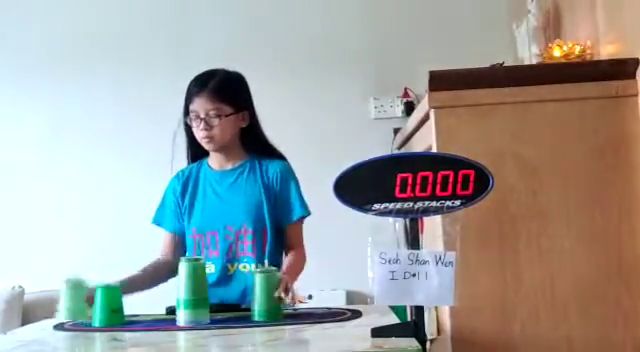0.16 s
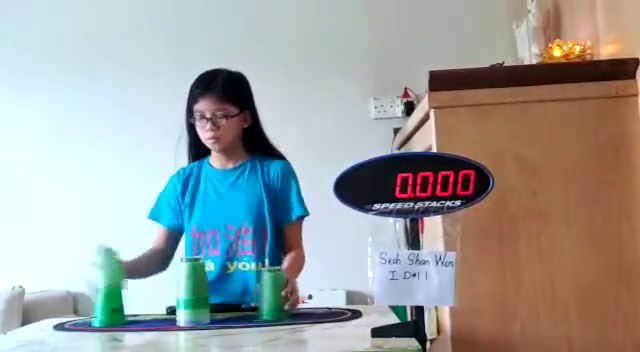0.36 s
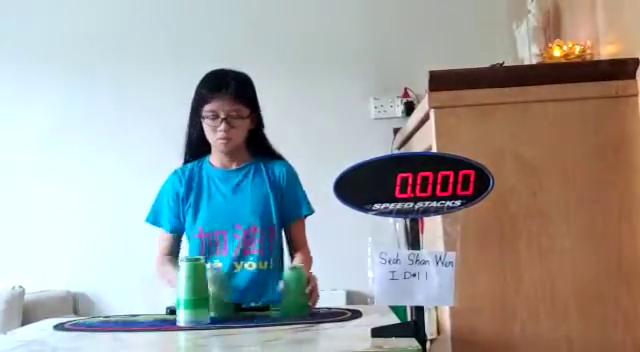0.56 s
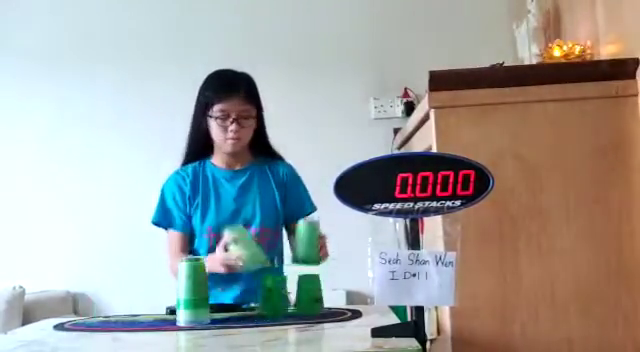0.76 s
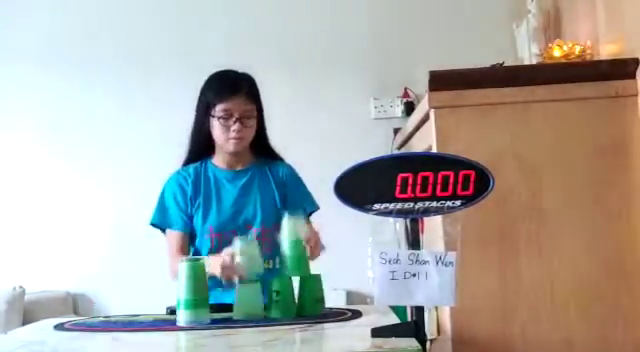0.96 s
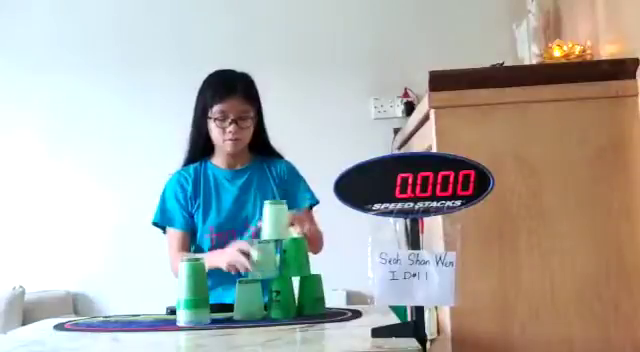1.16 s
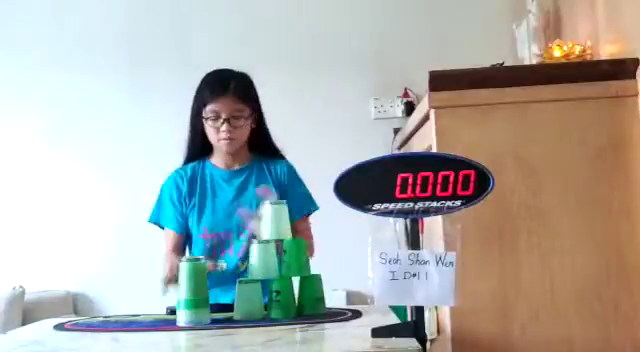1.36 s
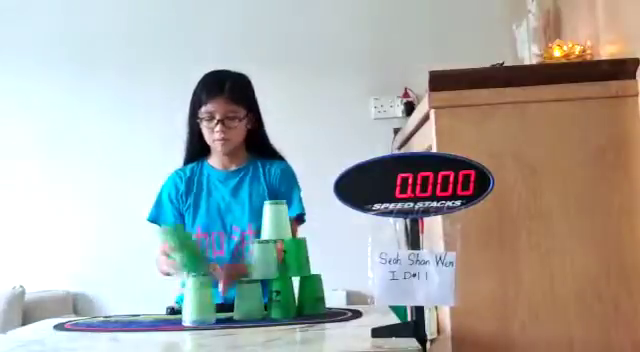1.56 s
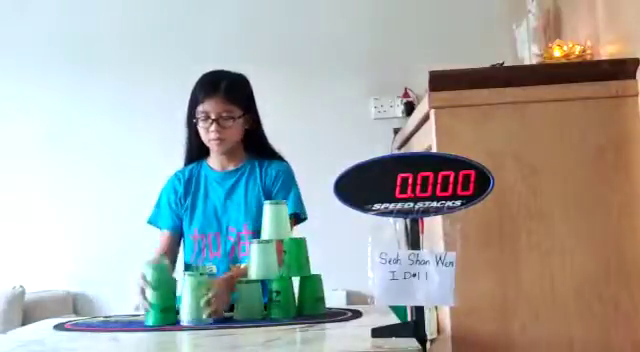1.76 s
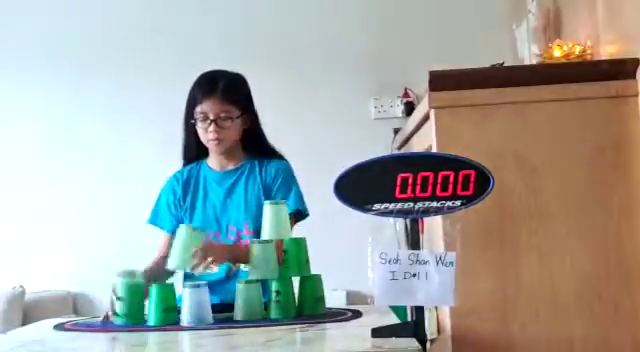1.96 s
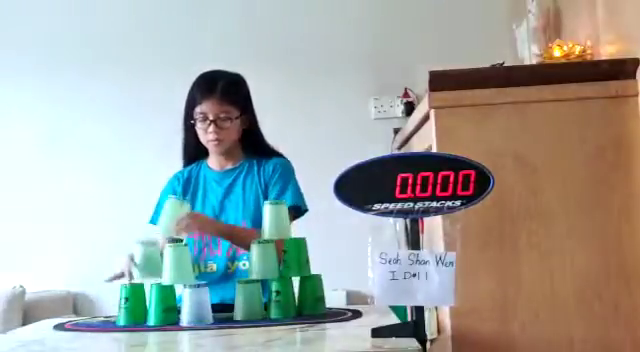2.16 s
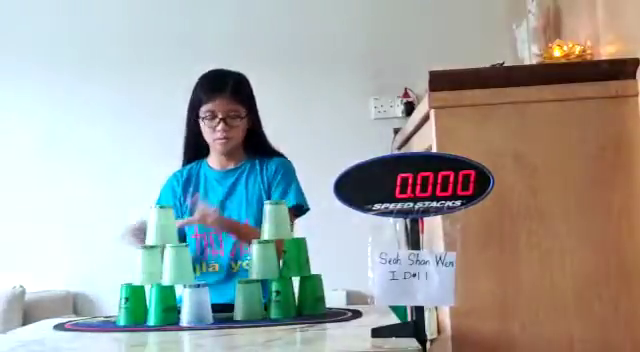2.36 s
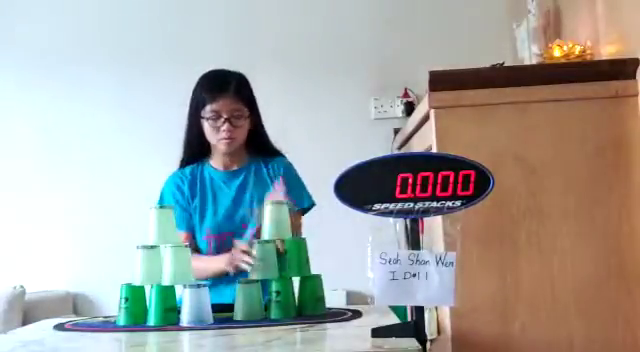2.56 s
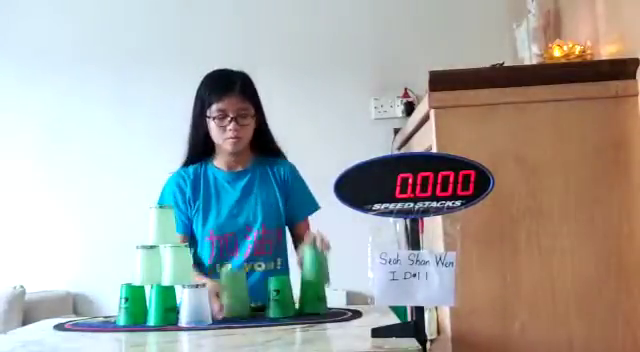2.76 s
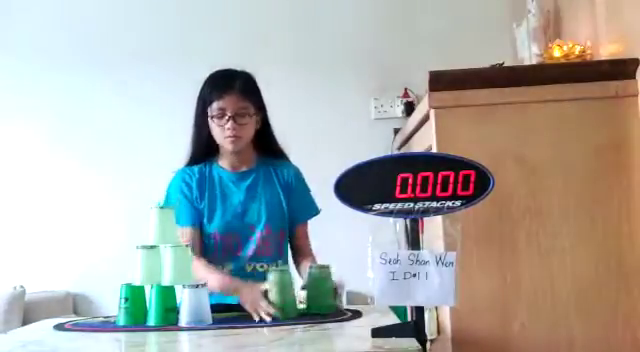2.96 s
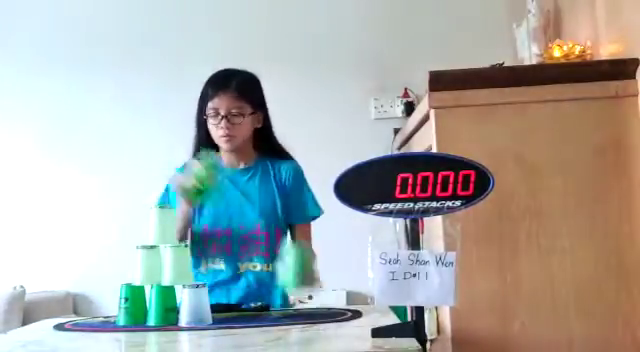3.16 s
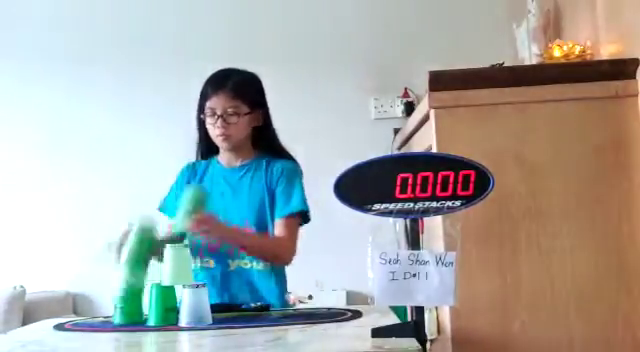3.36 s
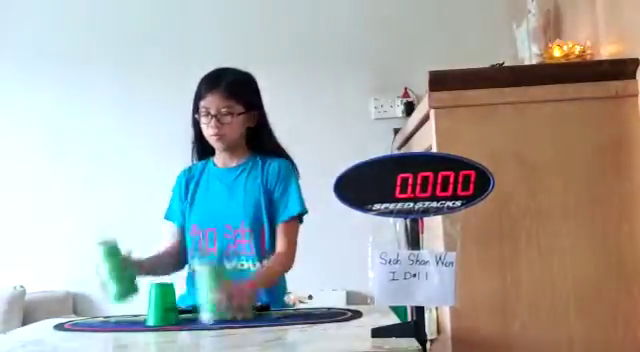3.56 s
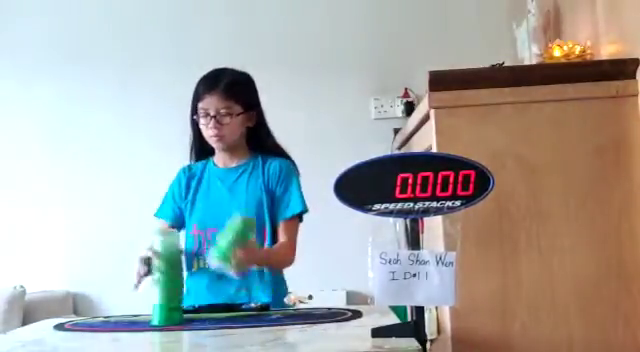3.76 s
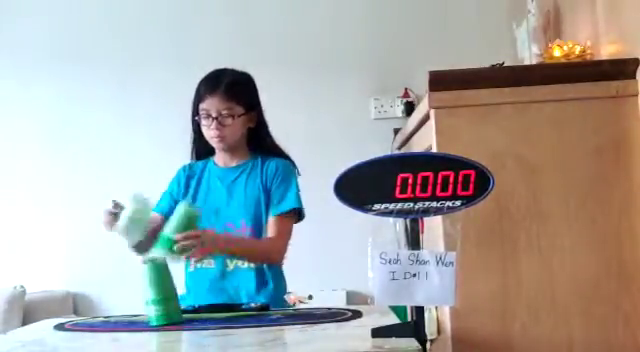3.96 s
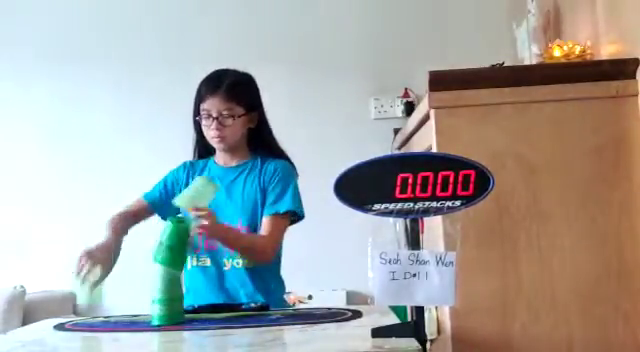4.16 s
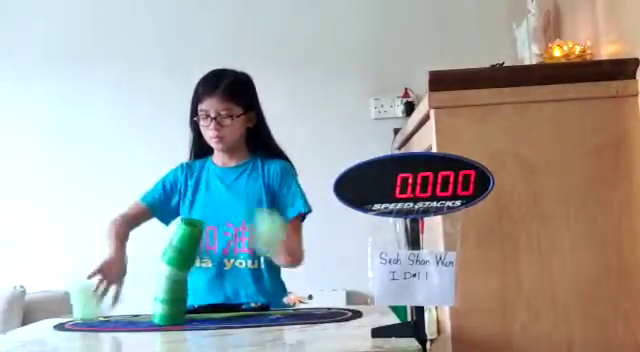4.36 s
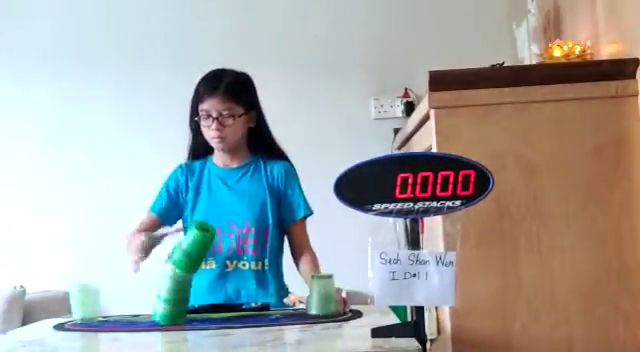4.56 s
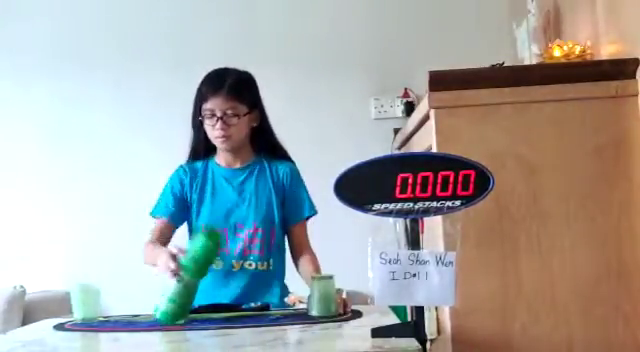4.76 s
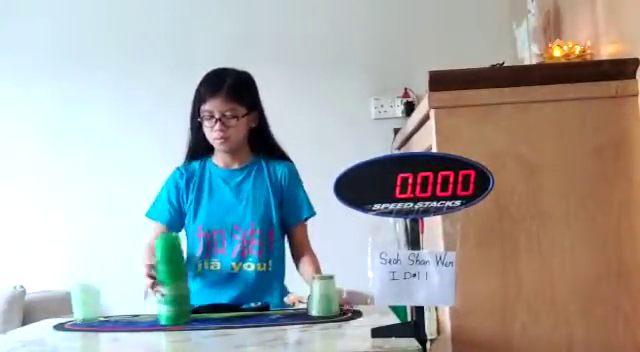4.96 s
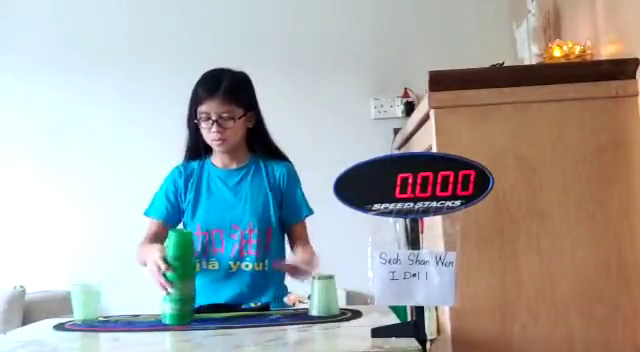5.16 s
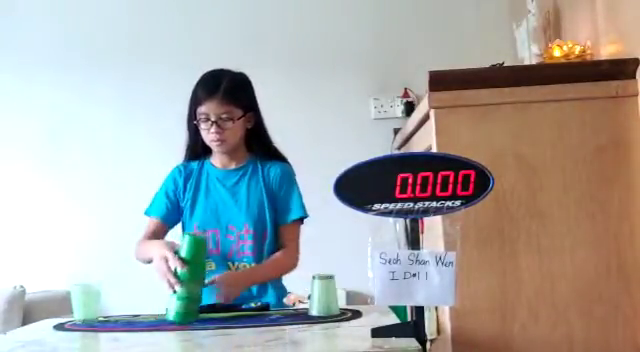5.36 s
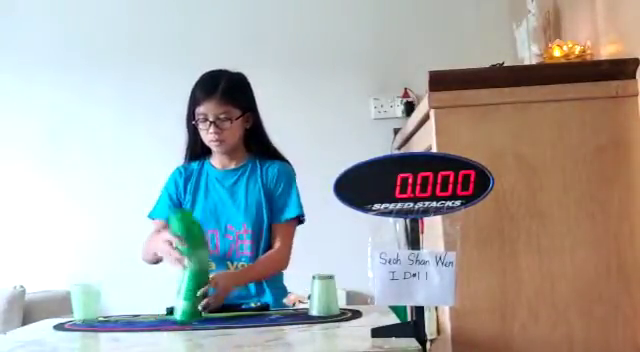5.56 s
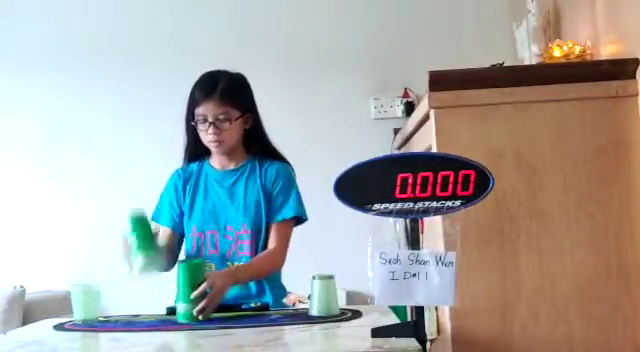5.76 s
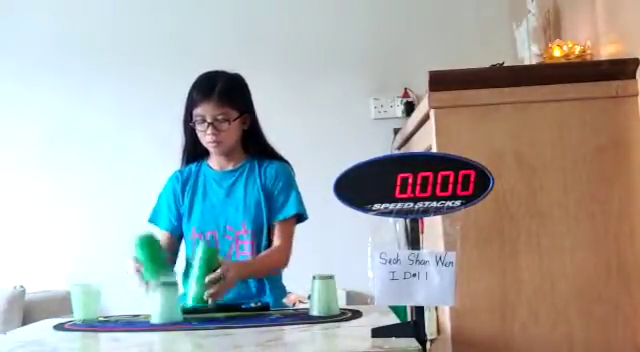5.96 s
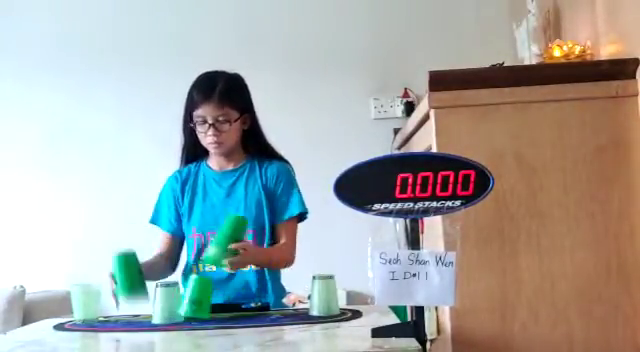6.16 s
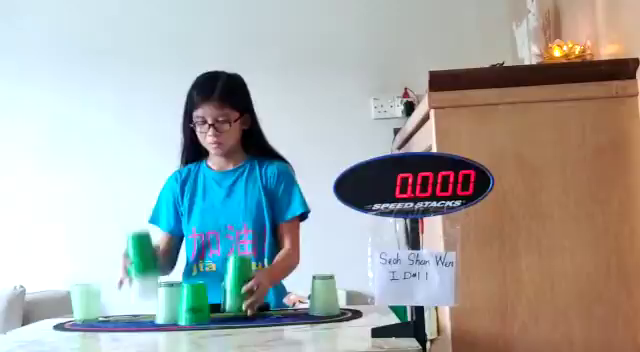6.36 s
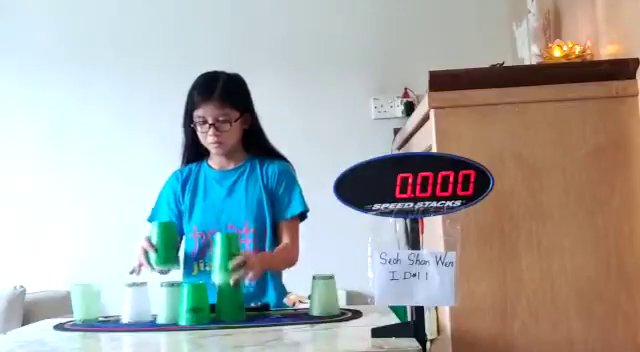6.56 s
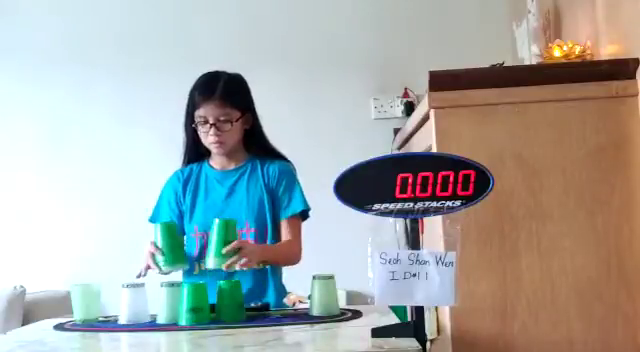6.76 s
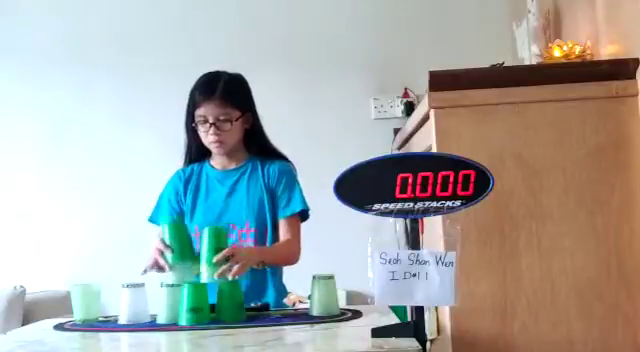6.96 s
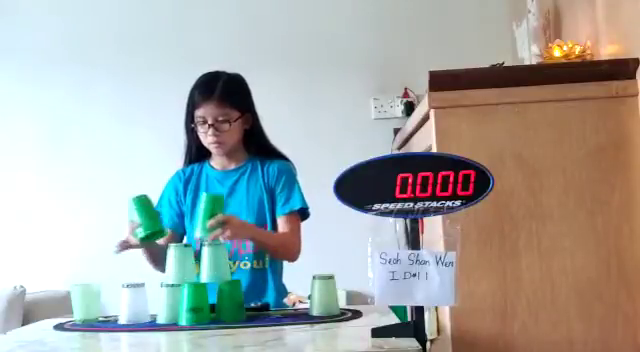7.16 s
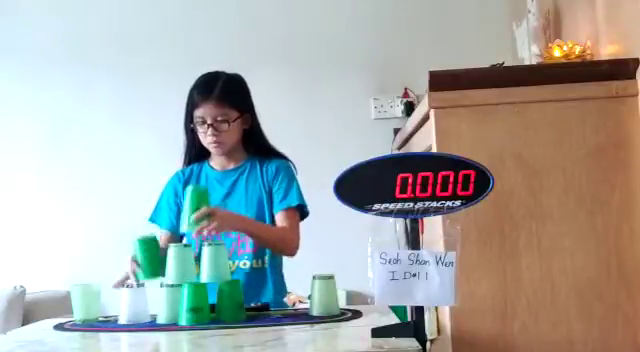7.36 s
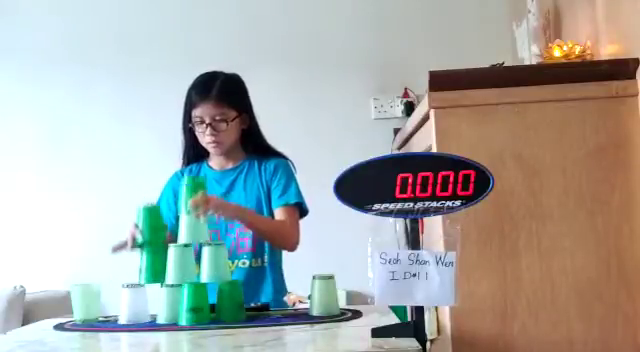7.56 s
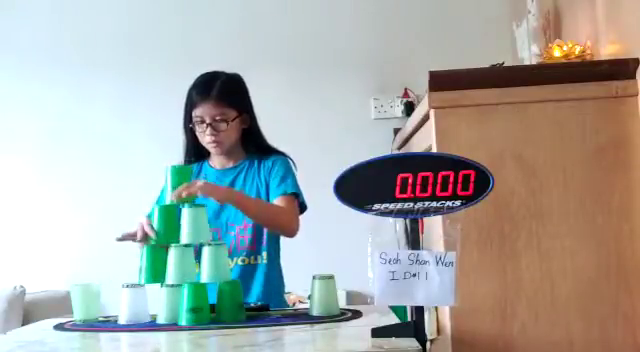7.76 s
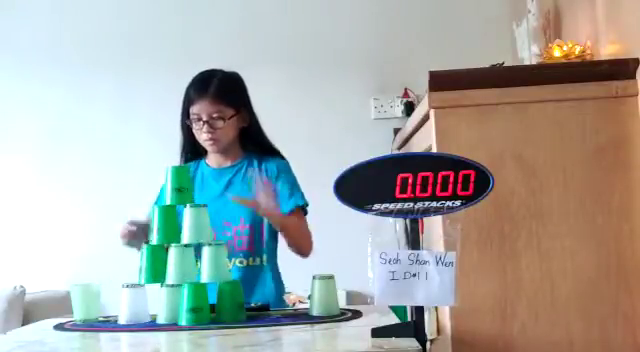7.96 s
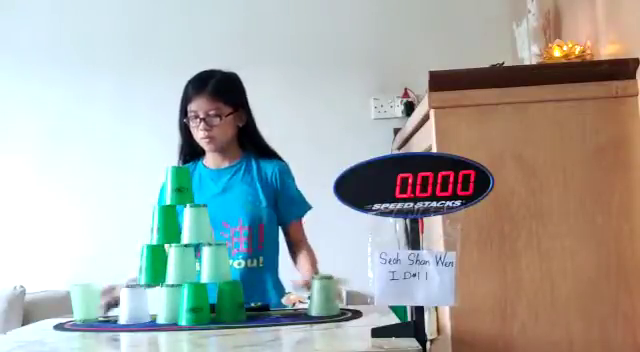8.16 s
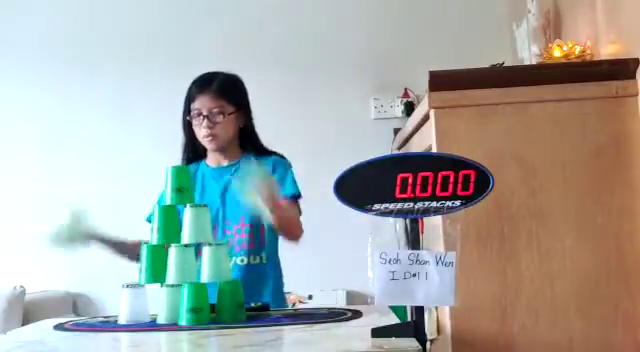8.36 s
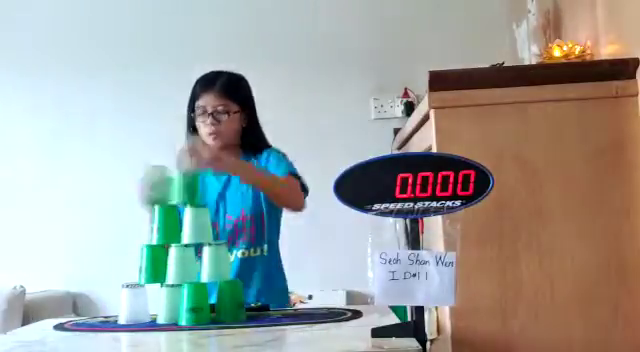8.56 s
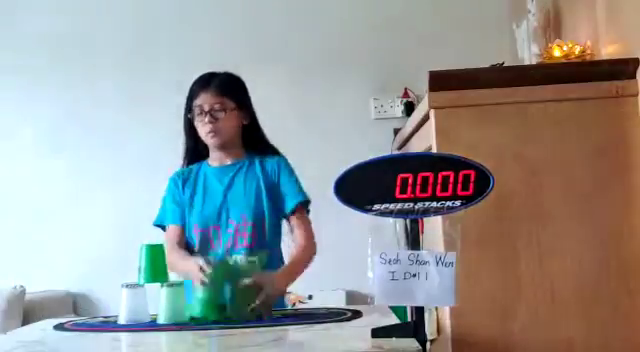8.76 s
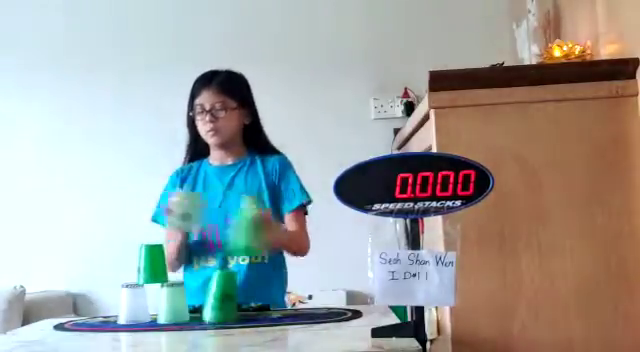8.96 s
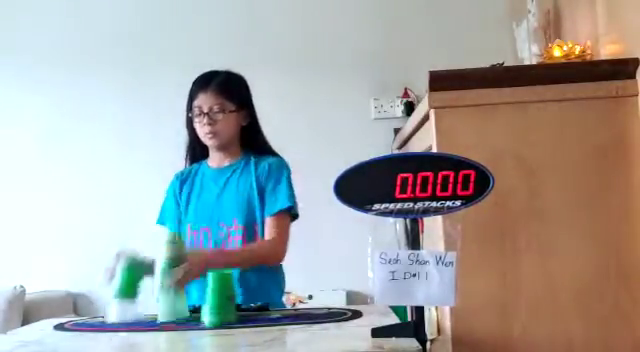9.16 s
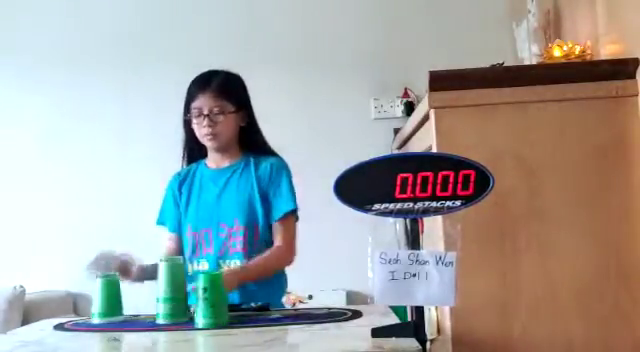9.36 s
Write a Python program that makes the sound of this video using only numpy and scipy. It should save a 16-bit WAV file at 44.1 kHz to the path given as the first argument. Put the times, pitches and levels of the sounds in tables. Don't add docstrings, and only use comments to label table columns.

```python
import sys
import numpy as np
from scipy import signal
from scipy.fft import rfft, irfft
from scipy.io import wavfile
from scipy.ndimage import uniform_filter1d

SR = 44100
rng = np.random.default_rng(int(sys.argv[2]) if len(sys.argv) > 2 else 0)


def put_to_file(sound):
    columns = np.atleast_2d(sound).T
    safe = np.clip(columns, -1, 1)
    whole_steps = np.round(safe * 32767)
    wavfile.write(sys.argv[1], SR, whole_steps.astype(np.int16))


def how_loud(loudness_db):
    steps = np.asarray(loudness_db, float) / 20
    return 10 ** steps


N = 415422

# frequency in Hz, density in dB per Hz.
RUB_COLOUR = [(710, -44.5), (1200, -12.5), (2450, -20.5), (2840, -19), (3130, -25), (6810, -11.5),
              (7830, -13), (8500, -64), (11000, -82), (18700, -120)]
# frequency in Hz, level in dB, t60 in seconds.
CUP_MODES = [(269, -4, 0.051), (366.9, -3.5, 0.06), (412, -5, 0.039), (482.6, -2.5, 0.024),
             (574.4, -0.5, 0.046), (670, -5.5, 0.044), (752.5, 1.5, 0.034), (839, -6.5, 0.043),
             (904, -9.5, 0.056), (1011, -12.5, 0.094), (1185, -11.5, 0.015)]
# frequency in Hz, level in dB, t60 in seconds.
TABLE_MODES = [(69.4, -5.5, 0.17), (87, -2.5, 0.052), (122.6, 13, 0.21), (150, 0.5, 0.027),
               (191.9, 12, 0.21), (234, -18, .07)]
# share of the ring pitch as a ratio, level in dB, t60 in seconds.
WALL_LOW = [(.72, -7, .005), (.86, -8, .005), (1, 2, .022), (1.19, -9, .005), (1.42, -9, .003)]
# frequency in Hz, level in dB, t60 in seconds.
WALL_MID = [(2600, -3, 0.0015), (3184, 4, 0.024), (3800, -8.5, 0.00071), (4155, -12.5, 0.0018)]
# frequency in Hz, level in dB, t60 in seconds.
WALL_TOP = [(4660, 9, 0.0019), (6150, 7, 0.0032), (6600, 5, 0.0023), (7050, -5, 0.0096),
            (7040, 6.5, 0.0048)]
# frequency in Hz, t60 in seconds.
ROOM_T60 = [(80, 0.84), (210, 0.66), (560, 0.49), (1470, 0.43), (3880, 0.47), (7500, 0.42)]
# frequency in Hz, left-right likeness from -1 to 1.
LIKENESS = [(60, 0.85), (140, 0.88), (310, 0.98), (710, 0.56), (1610, -0.49), (3670, 0.23), (8360, -0.32)]
# frequency in Hz, left-right difference in dB.
PORT_BALANCE = [(60, -3), (140, -0.5), (310, -1.0), (710, -1.0), (1610, -1.5), (3670, -0.5), (7000, 6.5),
                (8360, -6.5)]
# frequency in Hz, density in dB per Hz.
RUMBLE_COLOUR = [(15, -65), (25, -35), (45, -40), (96, -11), (118, -2), (151, -20.5), (182, 2), (216, -10),
                 (415, -12.5), (593, -21.5), (663, -10), (1140, -29), (1790, -46.5), (2200, -45),
                 (2860, -82), (4840, -120)]
# frequency in Hz, level in dB a bin.
NOISE_GUESS = [(900, -110), (1500, -85), (2500, -90), (4500, -89.5), (7000, -93.5)]
# frequency in Hz, density in dB per Hz.
HISS_COLOUR = [(700, -58), (1200, -27.5), (2400, -5), (4000, -9), (7000, -9), (8500, -10.5), (9500, -43.5)]
# delay in seconds, level in dB, left-right difference in dB.
ECHOES = [(.0042, -12, 0.5), (.0113, -5.5, -2.5), (.0175, -11.5, 2.5), (.0238, -8, -0.5), (.031, -14, 5),
          (.039, -9, -0.5)]

# start in seconds, blow in dB, strongest hollow pitch in Hz, contact length in seconds.
ON_MAT = [(1.856, -20, 325, 0.031), (2.016, -36, 338, .018), (2.079, -16, 367, 0.032),
          (2.68, -31.5, 366, 0.046), (2.749, -31.5, 815, 0.047), (2.783, -30.5, 296, 0.027),
          (2.948, -26.5, 506, 0.045), (3.353, -30, 595, 0.059), (3.463, -27.5, 626, 0.018),
          (3.521, -19.5, 716, 0.074), (3.545, -16.5, 382, 0.014), (3.672, -10, 448, .012),
          (3.69, -16, 361.5, .008), (3.719, -14.5, 352, .0043), (3.83, -24.5, 565, .008),
          (4.04, -30, 334, 0.01), (4.365, -34.5, 360, .0089), (4.644, -26.5, 404, 0.036),
          (4.742, -35, 329, 0.0095), (5.344, -36.5, 616, 0.012), (5.992, -17, 397, 0.0082),
          (6.335, -20, 412, 0.0053), (6.413, -32.5, 363, .008), (6.539, -26, 352, 0.025),
          (6.573, -23, 365, 0.0048), (6.693, -29, 362, 0.014), (9.17, -27, 385, 0.0086),
          (9.284, -32, 670, 0.0072), (9.321, -18.5, 250, 0.0056)]
# start in seconds, blow in dB, strongest hollow pitch in Hz, contact length in seconds.
ON_STACK = [(.255, -20, 650, 0.0051), (.266, -19.5, 377, 0.0073), (.478, -17.5, 480, 0.011),
            (.515, -25.5, 474, 0.0093), (.607, -21, 410, 0.0076), (1.971, -32, 336, 0.011),
            (2.142, -12.5, 480, 0.0037), (2.82, -13, 477, .025), (2.876, -21.5, 674, 0.002),
            (3.062, -9.5, 446, 0.0064), (3.078, -13.5, 390, 0.0035), (3.905, -11.5, 584.6, 0.012),
            (4.106, -27.5, 640, 0.012), (5.005, -27, 570, 0.0067), (5.382, -33, 580, 0.0076),
            (6.993, -20.5, 570, 0.0053), (8.709, -20, 600, 0.02), (8.818, -7.5, 605, 0.0045),
            (8.85, -11.5, 420, 0.015), (8.878, -17, 265, 0.017), (9.249, -9.5, 535, 0.0074),
            (9.341, -21, 703, 0.0014), (9.362, -17, 440, 0.0017)]
# start in seconds, blow in dB, strongest hollow pitch in Hz, contact length in seconds.
ON_PYRAMID = [(.096, -37.5, 288, 0.01), (.193, -31.5, 357, 0.022), (1.012, -11.5, 430, 0.024),
              (1.215, -23.5, 446, 0.024), (1.244, -16, 470, 0.019), (2.297, -12.5, 540, 0.0054),
              (2.357, -16, 556, 0.005), (3.022, -7, 454, 0.0084), (3.406, -24.5, 720, 0.043),
              (7.06, -23.5, 471, 0.015), (7.486, -21.5, 530, 0.051), (7.522, -12, 556, 0.0048),
              (7.619, -33.5, 574, 0.0044), (7.862, -16, 616, 0.014), (7.879, -16.5, 600, 0.0028),
              (8.649, -19, 593, 0.013), (8.671, -23, 398, 0.005), (8.771, -21, 412, 0.022),
              (9.389, -36, 358, 0.0073)]
# start in seconds, blow in dB, strongest hollow pitch in Hz, contact length in seconds.
NUDGES = [
    (.651, -58, 390, 0.0097),
    (.773, -62, 365, 0.015),
    (5.183, -48.5, 269, 0.01),
    (5.27, -47.5, 274, .012),
    (5.705, -48, 267, 0.0084),
    (6.242, -28.5, 360, 0.047),
    (6.633, -30.5, 362, 0.0048),
    (8.293, -38.5, 294, 0.039),
    (8.439, -65, 355, 0.011),
    (8.569, -46, 275, 0.011),
]
# start in seconds, snap in dB, wall ring pitch in Hz, rattle length in seconds.
KNOCKS = [(.603, -57.5, 1750, 0.0051), (.647, -58, 1440, 0.0049), (1.0164, -35.5, 1060, 0.0014),
          (2.6774, -51, 1130, 0.11), (2.9437, -33, 1810, 0.0085), (3.9035, -23, 1510, 0.005),
          (5.004, -48.5, 1505, 0.019), (5.341, -52.5, 1580, 0.031), (7.053, -50.5, 1717, 0.016),
          (7.861, -36.5, 1220, 0.028), (8.769, -33.5, 1284, 0.0088), (9.34, -37, 1260, 0.006)]
# start in seconds, snap in dB, wall ring pitch in Hz, rattle length in seconds.
CLAPS = [(.2516, -22, 1852, 0.0081), (1.2096, -34, 1210, 0.0093), (1.2416, -27, 1230, 0.0053),
         (1.523, -49, 1400, 0.0087), (2.2963, -32.5, 1270, 0.016), (2.356, -29.5, 1280, 0.004),
         (2.708, -42.5, 1360, 0.016), (2.75, -40, 1176, 0.03), (3.548, -25.5, 1373, .012),
         (4.102, -33.5, 1500, 0.0091), (5.3775, -39, 1560, 0.0063), (6.332, -57.5, 1400, 0.012),
         (7.479, -47, 1640, 0.022), (7.5202, -26.5, 1430, 0.0063), (7.888, -29, 1320, 0.0033),
         (8.6477, -32, 1235, 0.075), (8.7322, -20, 1380, 0.0037)]
# start in seconds, snap in dB, wall ring pitch in Hz, rattle length in seconds.
CLICKS = [(.4724, -40, 1770, 0.016), (.529, -41, 1310, 0.0077), (1.0063, -27.5, 1910, .0073),
          (1.858, -36.5, 1940, 0.021), (1.973, -37.5, 2250, 0.004), (2.138, -28.5, 1700, 0.0084),
          (2.781, -30, 1270, 0.057), (2.816, -17, 2030, 0.0023), (3.0196, -26.5, 1300, 0.033),
          (3.3732, -33, 1460, 0.0093), (3.4716, -30.5, 1390, 0.045), (3.518, -16, 2050, 0.0084),
          (3.6292, -41, 1420, 0.0089), (4.0364, -27.5, 1980, 0.007), (4.775, -52.5, 1280, 0.0083),
          (5.507, -55.5, 1350, 0.011), (5.996, -35, 1700, 0.0039), (6.58, -43.5, 1390, 0.014),
          (6.991, -36.5, 1720, 0.016), (7.858, -56, 1423, .012), (8.7055, -26, 1840, 0.059),
          (8.8144, -19.5, 2010, 0.01), (9.1661, -32.5, 1270, 0.068), (9.2477, -28.5, 2100, 0.024),
          (9.319, -26, 1800, 0.0059), (9.342, -35, 1950, 0.0073)]
# start in seconds, snap in dB, wall ring pitch in Hz, rattle length in seconds.
TICKS = [(.1798, -30, 1310, 0.021), (.4953, -33.5, 1300, 0.0075), (1.502, -37, 2450, 0.034),
         (2.086, -32, 1830, 0.013), (3.354, -37.5, 1300, .0081), (3.409, -32, 1630, 0.048),
         (4.296, -44.5, 1400, .012), (4.6404, -54, 1325, .012), (4.898, -55, 1345, 0.012),
         (5.676, -49, 1580, 0.034), (5.987, -50, 1500, .006), (6.006, -39, 1340, 0.014),
         (6.2163, -50.5, 1420, 0.011), (6.538, -48.5, 1240, 0.049), (8.293, -52, 1258, 0.017)]
# start in seconds, snap in dB, wall ring pitch in Hz, rattle length in seconds.
CRASHES = [
    (3.0652, -19.5, 1920, 0.0025),
    (3.671, -14, 1610, 0.0044),
    (8.848, -10.5, 1518, 0.0029),
]
# start in seconds, end in seconds, first hiss in dB, last hiss in dB, low share in dB.
STROKES = [(0, 0.23, -56, -60, 7), (0.543, 0.928, -64, -66, -15), (1.544, 1.89, -61.5, -71.5, 6.5),
           (1.88, 2.112, -60, -57, 4), (2.43, 2.628, -53, -74, 4.5), (4.14, 4.598, -61, -63, -27),
           (4.54, 5.03, -67.5, -76, 3), (5.423, 5.69, -66.5, -72, 9.5), (6.075, 6.33, -61.5, -75, -4),
           (6.316, 6.554, -74, -71.5, 3), (7.025, 7.309, -56.5, -70.5, -6), (8.251, 8.463, -70.5, -78, -6)]
# start in seconds, end in seconds, first pitch in Hz, last pitch in Hz, level in dB.
SQUEAKS = [
    (3.295, 3.35, 2330, 2310, -66),
    (4.42, 4.66, 2420, 2400, -75),
    (4.66, 4.93, 2290, 2470, -73),
    (4.95, 5.12, 2420, 2400, -79),
]


def evened(x):
    return x / np.sqrt(np.mean(x ** 2) + 1e-20)


def read(points, hz):
    f, value = np.transpose(points)
    return np.interp(np.log(hz + 1), np.log(f + 1), value)


def add(mix, s, sound):
    part = mix[..., round(s * SR):][..., :sound.shape[-1]]
    part += sound[..., :part.shape[-1]]


def by_time(*kinds):
    events = []
    for rows, *shared in kinds:
        events += [row + tuple(shared) for row in rows]
    return sorted(events)


def pair(left, other, hz):
    same = np.clip(read(LIKENESS, hz), -1, .93)[:, None]
    return np.array([left, same * left + np.sqrt(1 - same ** 2) * other])


def noise(colour, patchy_db):
    frames, hz = N // 256 + 5, np.fft.rfftfreq(1024, 1 / SR)
    a, b, c, d, patches = rng.standard_normal((frames, 513, 5)).T
    patches = uniform_filter1d(patches, size=6, axis=0)
    patches = evened(uniform_filter1d(patches, size=6, axis=1))
    gain = how_loud(read(colour, hz)[:, None] + patchy_db * patches)
    z = pair(a + 1j * b, c + 1j * d, hz) * gain
    return evened(signal.istft(z, nperseg=1024, noverlap=768)[1][:, :N])


def ring(modes, extra_db, detune, t):
    hz, db, t60 = np.transpose(modes)[:, :, None]
    phase = 2 * np.pi * rng.random(hz.shape)
    decay = how_loud(db + extra_db - 60 * t / t60)
    return (decay * np.sin(2 * np.pi * hz * detune * t + phase)).sum(0)


def touches(per_s):
    force = rng.standard_normal(SR * 3 // 50)
    return force * (rng.random(len(force)) < per_s / SR)


def contact(length, chance):
    t = np.arange(len(chance)) / SR
    train = chance * np.exp(-t / np.clip(length, .001, .05))
    train[0] = 1
    return train


def rubbing():
    hiss, out = noise(RUB_COLOUR, patchy_db=3.0), np.zeros((2, N))
    low = signal.sosfilt(signal.butter(2, 4200, fs=SR, output="sos"), hiss)
    for start, end, first_db, last_db, low_db in STROKES:
        span = np.arange(round(start * SR), round(end * SR))
        level = how_loud(np.linspace(first_db, last_db, len(span)))
        if start > .1:
            fade = signal.windows.tukey(len(span), .3)
        else:
            fade = np.linspace(1, 0, len(span))
        out[:, span] += fade * level * (hiss[:, span] + (how_loud(low_db) - 1) * low[:, span])
    return out


def rumble():
    return how_loud(-48.5) * noise(RUMBLE_COLOUR, patchy_db=2.6) + how_loud(-76) * noise(HISS_COLOUR, patchy_db=0.5)


def landings():
    out, t, hz = np.zeros(N), np.arange(SR // 4) / SR, np.transpose(CUP_MODES)[0][:, None]
    blows = by_time((ON_MAT, -12.5), (ON_STACK, -17), (ON_PYRAMID, -28), (NUDGES, -3.5))
    for s, blow_db, hollow_hz, length, thump_db in blows:
        vary_db, vary_hz = rng.standard_normal((2, len(CUP_MODES), 1))
        octaves = np.log2(hz / hollow_hz)
        lean_db = -15.0 * abs(octaves) - 0.61 * np.maximum(octaves, 0) + 1.1 * vary_db
        cup = ring(CUP_MODES, lean_db, 1 + .01 * vary_hz, t)
        cup = cup * (1 - np.exp(-t / .0024)) ** 2
        table = ring(TABLE_MODES, 3 * vary_db[:6], 1 + .02 * vary_hz[:6], t)
        table = table * (1 - np.exp(-t / .007)) ** 2
        cup = signal.fftconvolve(cup, contact(length, 0.74 * touches(per_s=300)))
        add(out, s - .004, how_loud(blow_db + 2.5) * cup / abs(cup).max())
        add(out, s - .004, how_loud(blow_db + thump_db + 7.0) * table / abs(table).max())
    return signal.sosfilt(signal.butter(2, 55, "high", fs=SR, output="sos"), out)


def all_round(sound):
    power = abs(rfft(sound, 4096)) ** 2
    ring_share = .5
    power = ring_share * uniform_filter1d(power, size=28) + (1 - ring_share) * uniform_filter1d(power, size=110)
    return np.roll(irfft(np.sqrt(power)), 100)[:400]


def clacks():
    direct, spread = np.zeros((2, N))
    t = np.arange(SR // 30) / SR
    onset = 1 - np.exp(-t / .00025)
    snaps = by_time((KNOCKS, 8.5, -25), (CLAPS, -1.5, -17.5), (CLICKS, -7.5, -17.5),
                    (TICKS, -15.5, -18.5), (CRASHES, -0.5, -16.5))
    for s, snap_db, wall_hz, length, low_db, mid_db in snaps:
        sound = 0
        knocks = touches(per_s=290)
        for modes, scale, share_db in ((WALL_TOP, 1, 0), (WALL_LOW, wall_hz, low_db), (WALL_MID, 1, mid_db)):
            rings, trains = [], []
            for mode in modes:
                extra_db, detune = 2.0 * rng.standard_normal(), scale * rng.normal(1, 0.028)
                rings.append(ring([mode], extra_db, detune, t) * onset)
                trains.append(contact(length, 0.21 * touches(per_s=6800) + 0.35 * knocks))
            part = signal.fftconvolve(rings, trains, axes=1).sum(0)
            sound = sound + how_loud(share_db) * part / abs(part).max()
        add(direct, s, how_loud(snap_db - 2.0) * sound)
        add(spread, s, how_loud(snap_db) * all_round(sound))
    return direct, spread


def squeak():
    out = np.zeros(N)
    for start, end, first_hz, last_hz, db in SQUEAKS:
        t = np.arange(start, end, 1 / SR)
        waver = 1 + .012 * evened(uniform_filter1d(rng.standard_normal(len(t)), size=200))
        tone_db = db + 3 * evened(uniform_filter1d(rng.standard_normal(len(t)), size=900))
        hz = np.linspace(first_hz, last_hz, len(t)) * waver
        tone = np.sin(2 * np.pi * np.cumsum(hz) / SR)
        add(out, start, how_loud(tone_db) * tone * signal.windows.tukey(len(t), .7))
    return out


def early(x):
    out = np.array([x, x])
    for k, (delay, db, side_db) in enumerate(ECHOES):
        lag = round(delay * SR)
        for port, sign in enumerate((1, -1)):
            arrival = lag + 3 + sign * 3 * (-1) ** k
            add(out[port], arrival / SR, how_loud(db + sign * side_db / 2) * x)
    return out


def room(x):
    out, turn = np.zeros((2, N)), 2 * np.pi * np.arange(N) / SR * 1.7
    size = SR * 2 // 3
    build_up = 1 - 2.0 * np.exp(-np.arange(size) / SR / 0.0026)
    for k in range(3):
        taps = np.zeros((2, SR))
        at = np.arange(120, SR - 20, 20) + rng.integers(0, 20, (2, (SR - 121) // 20))
        np.put_along_axis(taps, at, rng.choice([-1., 1.], at.shape), 1)
        hz, t, z = signal.stft(taps, SR, nperseg=512)
        decay = how_loud(-60 * t / read(ROOM_T60, hz)[:, None])
        tail = signal.istft(pair(*z, hz) * decay, SR, nperseg=512)[1]
        tail = tail[:, :size] * build_up
        feed = x * np.cos(turn + k * np.pi / 3) * np.sqrt(2 / 3)
        out += signal.oaconvolve(feed[None], tail / np.linalg.norm(tail[0]), axes=1)[:, :N]
    return out


def scene():
    friction, background = rubbing(), rumble()
    low, (high, spread), thin = landings(), clacks(), squeak()
    airy = signal.sosfilt(signal.butter(1, 220, "high", fs=SR, output="sos"), low)
    near = how_loud(-2.0) * early(low + how_loud(1.0) * high)
    far = room(how_loud(-4.5) * airy + how_loud(2.5) * spread)
    return near + thin + far + friction + background


def suppress(z, hz):
    power = uniform_filter1d((abs(z) ** 2).mean(0), size=3, axis=0)
    power = uniform_filter1d(power, size=3, axis=1)
    error = uniform_filter1d(rng.standard_normal(power.shape), size=2, axis=0)
    error = evened(uniform_filter1d(error, size=50, axis=1))
    guess_db = read(NOISE_GUESS, hz)[:, None] + 6 * np.maximum(error, 0)
    over = (power / how_loud(guess_db) ** 2) ** 1.7
    open_db = np.maximum(20 * np.log10(over / (1 + over) + 1e-9), -40)
    fall = np.arange(z.shape[-1]) * 256 / SR * 49.0
    return z * how_loud(np.maximum.accumulate(open_db + fall, axis=1) - fall)


def top_cut(x):
    return signal.sosfilt(signal.butter(12, 8960, fs=SR, output="sos"), x)


def record(dry):
    hz, _, z = signal.stft(dry, SR, nperseg=512)
    balance_db = read(PORT_BALANCE, hz)[:, None] * np.array([.5, -.5])[:, None, None]
    z = suppress(z, hz) * how_loud(balance_db)
    edge_db = -np.minimum(np.maximum(hz - 7900, 0) * 0.39, 75)
    x = signal.istft(z * how_loud(edge_db)[:, None], SR, nperseg=512)[1][:, :N]
    x = np.tanh(x)
    x = x * np.minimum(np.arange(N, 0, -1) / 150, 1)
    return top_cut(x)


dry = scene()
out = record(dry)
put_to_file(out)
```